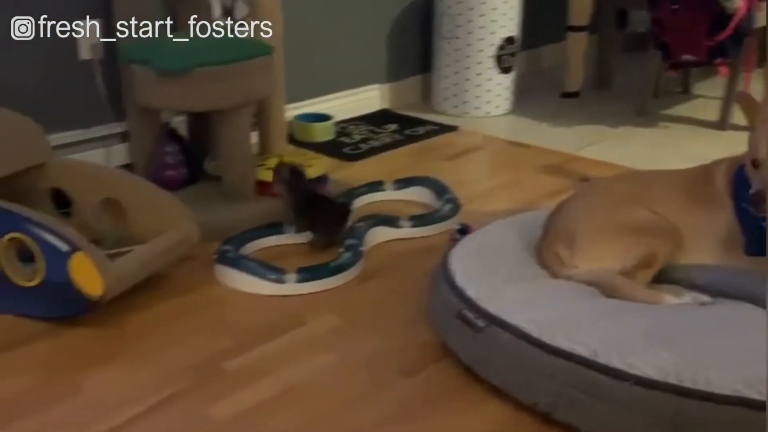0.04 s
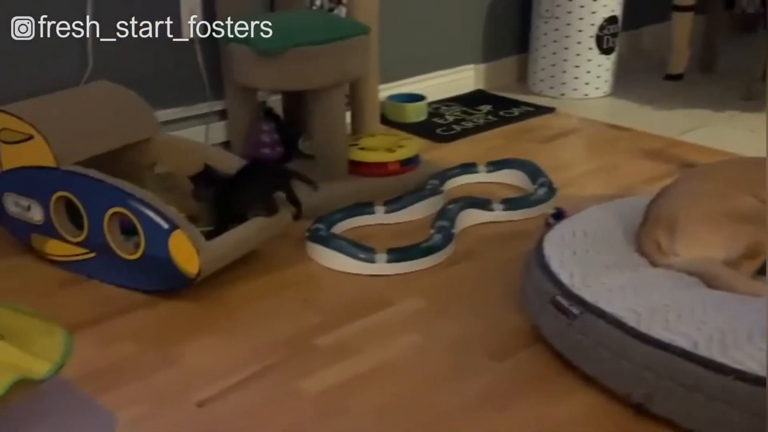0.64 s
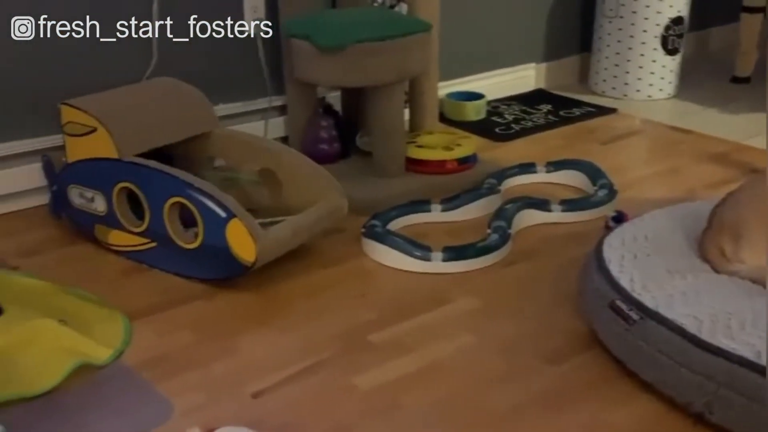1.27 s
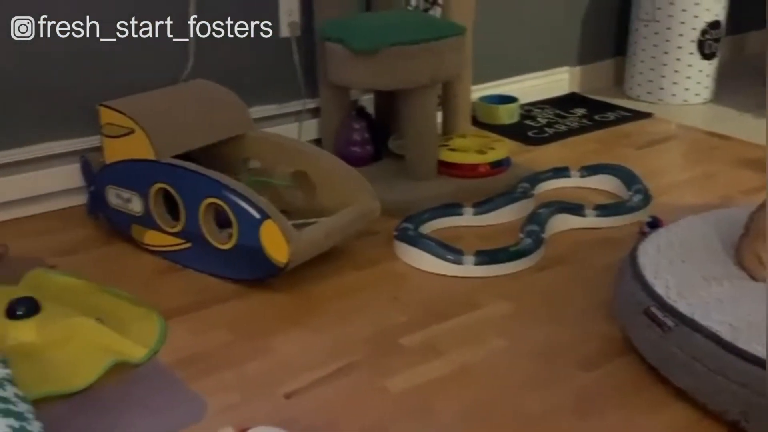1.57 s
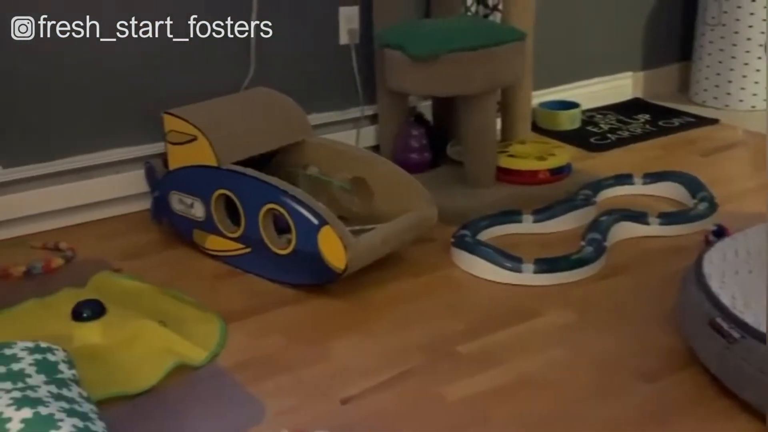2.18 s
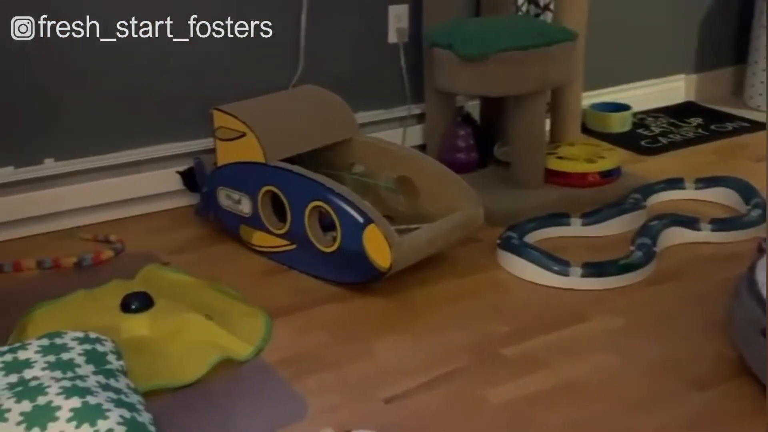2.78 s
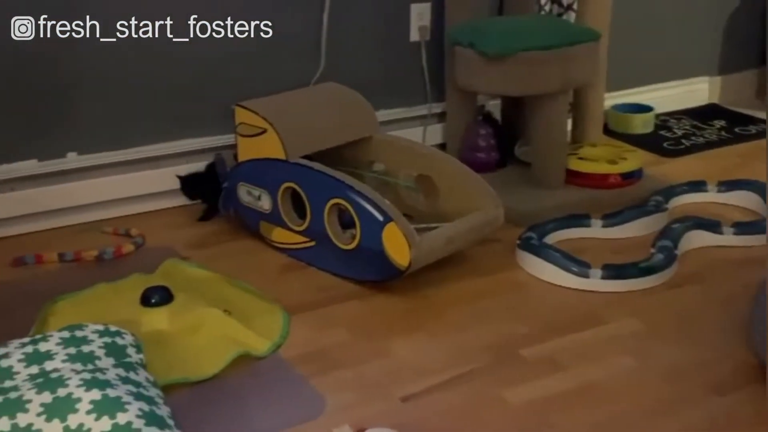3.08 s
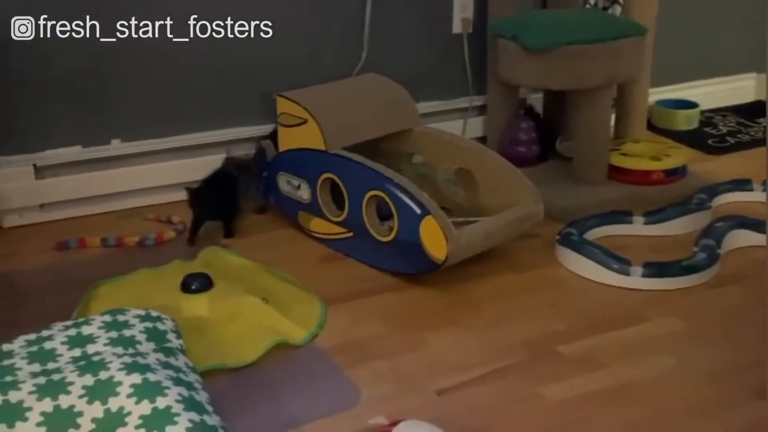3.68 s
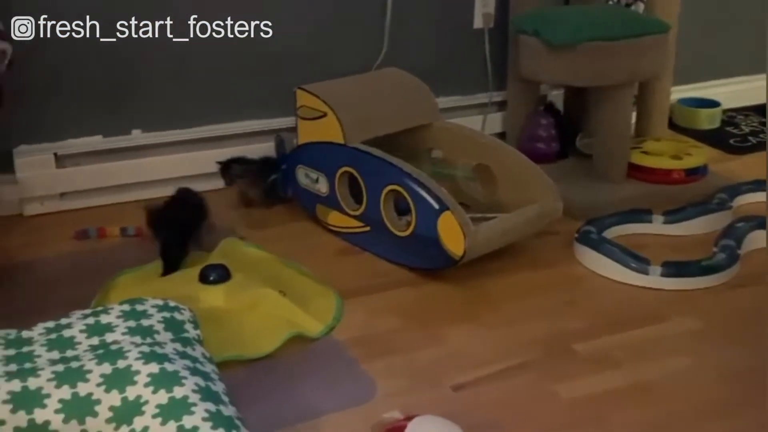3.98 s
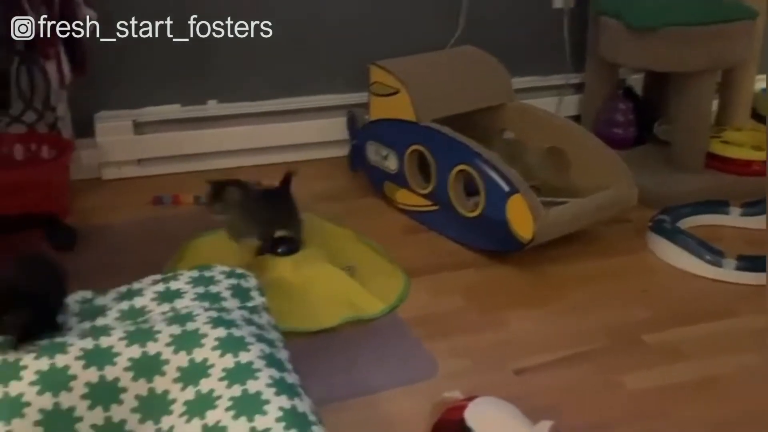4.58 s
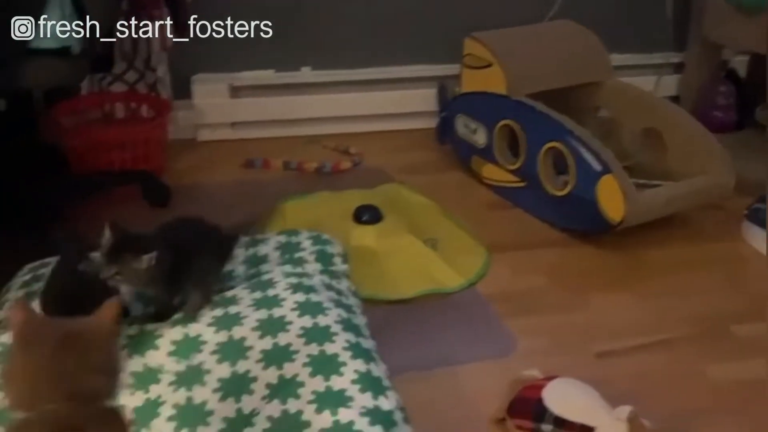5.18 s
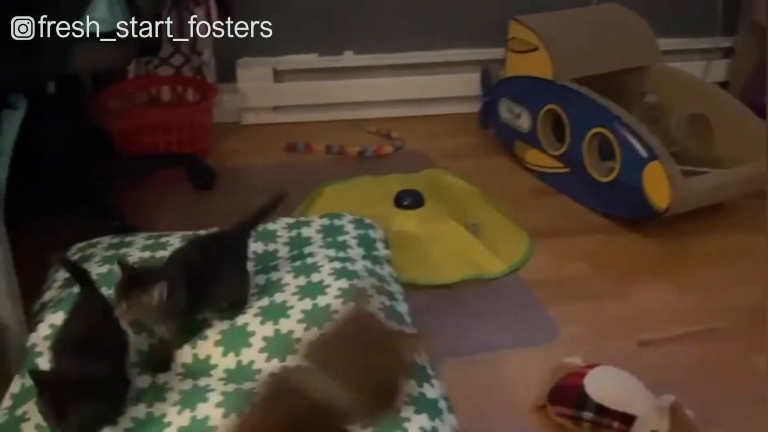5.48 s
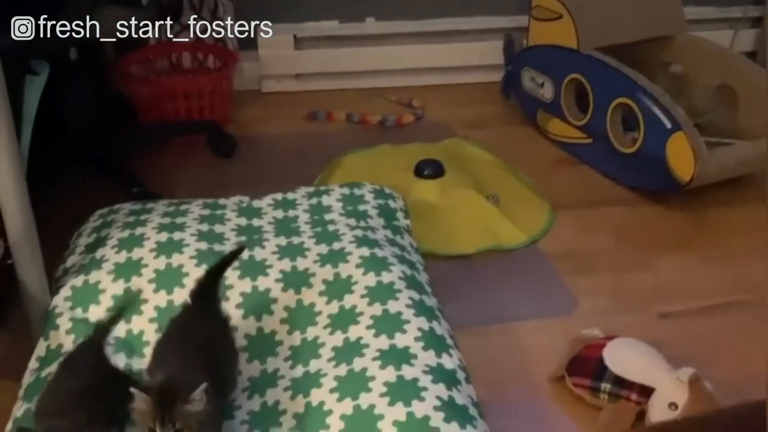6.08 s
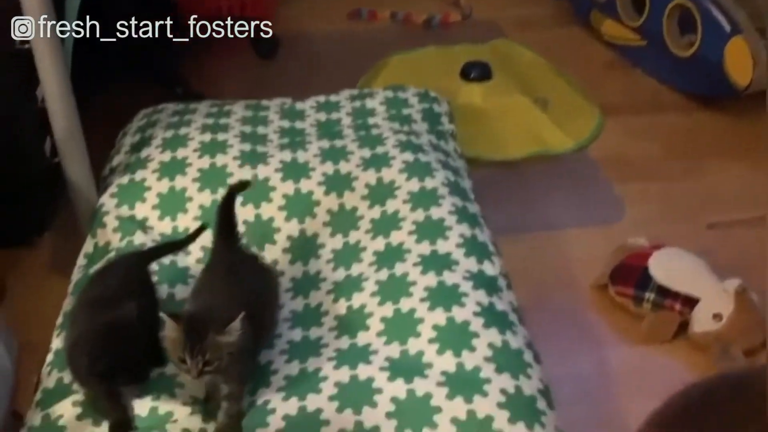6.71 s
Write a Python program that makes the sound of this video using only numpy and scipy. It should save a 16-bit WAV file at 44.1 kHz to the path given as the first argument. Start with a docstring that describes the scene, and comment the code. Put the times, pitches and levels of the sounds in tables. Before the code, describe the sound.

Kittens romp on a wooden floor in a small room with short reflections and a faint, steady appliance hum. At about 0.3 seconds paws thump and shake the boards, and at 0.45 a plastic ball track gives a sharp click, the loudest sound, with a short claw rasp. A heavier cluster of thumps comes from 0.9 to 1.3 seconds, with ticks and cardboard scratching. A tiny bell jingles faintly around 1.2 and 1.5 seconds. A lull follows, holding only soft rustles and an occasional tick. From 3.4 seconds the scampering returns: light paw thuds, claw clicks and scratchy swishes over cloth, busiest between 4.2 and 4.9, with a hollow plastic toy rattling from 4.4 to 4.7. Soft landings and fabric rustles continue until about 5.9 seconds, then fade to a last faint brush near 6.5 and the hum.

```python
"""A small room with a wooden floor, where kittens romp. One clips a plastic ball track and bounds into
a cardboard playhouse, and a toy's tiny bell jingles; then two scamper over a toy's nylon skirt, rattling
its hub, and onto a cushion. Paws thump and shake the boards, claws tick and rasp, fur rustles over
cardboard and cloth. The walls answer every move, over a faint appliance hum."""
import sys
import numpy as np
from scipy import signal
from scipy.fft import rfft, irfft, next_fast_len
from scipy.io import wavfile
from scipy.ndimage import uniform_filter1d, map_coordinates

SR = 44100
rng = np.random.default_rng(int(sys.argv[2]) if len(sys.argv) > 2 else 0)


def inscribe(sig):
    """Save sig as 16-bit PCM at rate SR to the path in sys.argv[1].

    A 1-D sig is mono; a 2-D sig holds one channel per row.
    Samples are clipped to [-1, 1] before scaling.
    """
    pcm = np.round(np.clip(np.atleast_2d(sig).T, -1, 1) * 32767)
    wavfile.write(sys.argv[1], SR, pcm.astype(np.int16))


N = 302069

# Levels in the tables are relative; each layer sets its own trim. decay_s is the time to fall 60 dB.
# Colour of the still air: freq_hz, level_db
AIR_SPECTRUM = [(13, -42.5), (22, 0), (121, -3), (193, -9), (262, 2.5), (345, -15), (407, -6.5), (705, -33),
                (832, -23.5), (2300, -32), (5550, -40.5), (6920, -35.5), (8390, -41), (10700, -40.5),
                (15800, -45)]
# Partials of the appliance hum: pitch_hz, level_db
HUM_PARTIALS = [(59.2, -70), (119, -68.5), (272, -71.5), (414, -83)]
# Fur and claw strokes on cardboard and cloth: start_s, swell_s, hold_s, brush_db, scratch_db, swish_db
RUSTLE_STROKES = [(0.0, 0.002, 0.0093, -52, -75, -84), (0.257, 0.031, 0.1, -57, -51.5, -61.5),
                  (0.431, .008, 0.016, -57, -46.5, -47), (0.51, 0.022, .17, -69, -64.5, -72),
                  (0.69, 0.012, 0.084, -61, -67, -75), (0.856, 0.024, .005, -57.5, -66, -72.5),
                  (0.914, 0.064, .02, -73, -69, -83), (0.991, 0.01, .03, -60, -59, -82),
                  (1.017, 0.07, 0.045, -58, -51.5, -56), (1.195, 0.0064, 0.011, -47.5, -54, -50.5),
                  (1.254, 0.017, 0.011, -58.5, -63.5, -65), (1.37, 0.017, 0.019, -66.5, -80, -87),
                  (1.517, 0.026, 0.063, -70, -77.5, -86), (1.617, 0.074, 1, -78, -81, -87),
                  (2.038, 0.013, 0.056, -70.5, -80, -88), (2.22, 0.057, 0.015, -68, -72.5, -73.5),
                  (2.364, .035, 0.047, -92, -76, -68), (2.429, 0.033, 0.017, -66.5, -76, -83),
                  (2.54, .04, 0.037, -76, -82, -90), (2.603, 0.16, .25, -84.5, -87, -88.5),
                  (2.932, 0.0071, .005, -95, -86, -79), (3.165, 0.056, 0.058, -80, -86, -89),
                  (3.37, 0.037, .04, -70.5, -70, -77), (3.423, 0.072, 0.014, -64, -59, -62.5),
                  (3.526, 0.049, 0.12, -63.5, -58.5, -64.5), (3.719, 0.0078, 0.031, -61.5, -55.5, -57.5),
                  (3.816, 0.022, 0.038, -73, -67, -73), (3.954, .033, 0.021, -69, -52, -54),
                  (4.03, 0.018, .005, -65.5, -60.5, -79), (4.093, 0.07, 0.019, -57, -59, -71.5),
                  (4.242, 0.042, 0.034, -54, -61.5, -67.5), (4.361, .025, 0.016, -56.5, -55, -65.5),
                  (4.443, 0.052, 0.055, -55.5, -65, -89), (4.495, 0.0082, 0.0085, -50.5, -51.5, -62.5),
                  (4.577, 0.016, 0.057, -54, -58.5, -79), (4.814, 0.015, 0.073, -66, -69, -82),
                  (5.07, .01, 0.0054, -66.5, -77.5, -86), (5.151, 0.026, 0.0059, -65, -70, -83),
                  (5.207, .022, .005, -69, -72.5, -81), (5.286, .015, .005, -70, -68, -80),
                  (5.302, 0.0065, 0.018, -60, -67, -76.5), (5.494, 0.026, .02, -62, -72.5, -81),
                  (5.527, .03, .02, -68, -61.5, -73.5), (5.605, 0.049, 0.039, -68.5, -70.5, -79),
                  (5.685, .025, 0.008, -59, -61, -73), (5.823, 0.0045, .008, -69.5, -76, -82),
                  (5.98, 0.056, 0.07, -72.5, -77.5, -87), (6.48, 0.066, 0.08, -82, -89, -95)]
# Colours of the dull brush, the dry scratch and the fine swish: freq_hz, level_db
BRUSH_SPECTRUM = [(200, -31.5), (450, -1), (650, -2), (900, 5), (1200, 0.5), (1700, -8), (2600, -10.5),
                  (5000, -54)]
SCRATCH_SPECTRUM = [(800, -54.5), (1500, -6), (2300, 2.5), (3400, -1.5), (5200, -1), (7300, -1),
                    (8300, -18), (10000, -24.5), (14000, -46.5)]
SWISH_SPECTRUM = [(4000, -45.5), (7000, -1), (8200, 0), (9800, 2), (12000, -0.5), (13500, -8), (15000, 2.5),
                  (16000, -15.5)]
# Low murmur of the floor under light steps: freq_hz, level_db
PATTER_SPECTRUM = [(30, -18), (60, -0.5), (140, 1.5), (195, -9), (260, -2), (400, -2), (520, -14.5),
                   (900, -25.5), (2500, -53.5)]
# Paw landings: start_s, level_db, pitch_hz, decay_s, slap_offset_db
PAW_LANDINGS = [(0.004, -42.5, 97.5, 0.31, -14), (0.264, -39, 137.5, 0.32, -12),
                (0.315, -24.5, 347.6, 0.073, -8), (0.328, -31.5, 150, 0.13, -19),
                (0.340, -25.5, 107, 0.15, -10), (0.356, -24.5, 256.5, 0.13, -5),
                (0.371, -26.5, 313, 0.048, -9), (0.421, -36, 91.5, 0.21, -19), (0.604, -51.5, 240, 0.1, 8),
                (0.71, -42, 140.5, 0.21, 5.5), (0.752, -54, 135, .06, 3), (0.897, -23, 130.6, .11, -27),
                (0.932, -23, 289, 0.065, -27), (0.941, -20.5, 150, .17, -35),
                (0.956, -21.5, 94.4, 0.17, -30), (0.977, -23, 87.5, 0.076, -24),
                (1.009, -30.5, 80, .05, -11), (1.09, -39.5, 150, 0.18, 2.5), (1.205, -29, 314.3, .14, -0.5),
                (1.234, -30, 139, 0.16, -19), (1.257, -36.5, 89, 0.22, -8), (2.189, -54, 134, .15, -9),
                (3.48, -58, 160, .1, -6), (3.672, -42, 162, .073, 0.5), (3.743, -42, 315, 0.1, 1.5),
                (3.985, -52, 167, .054, 0), (4.047, -47, 340, 0.071, -6), (4.165, -40, 270, 0.12, -3.5),
                (4.231, -42, 127, 0.29, -11), (4.285, -31, 112, 0.13, -8), (4.304, -40, 191, 0.1, 0),
                (4.355, -33.5, 319, 0.049, -4), (4.368, -29, 132, 0.071, -31),
                (4.419, -45.5, 102.6, 0.34, -19), (4.554, -34, 123, 0.066, -11),
                (4.578, -34.5, 148, 0.047, -8), (4.622, -40, 84, .13, -9), (4.690, -48, 332, 0.12, -19),
                (4.733, -41, 273, 0.049, 0.5), (4.847, -26.5, 138, 0.063, -24),
                (4.897, -40, 212, 0.098, -18), (5.090, -32, 385, 0.039, -11.5),
                (5.185, -28.5, 129, 0.065, -12), (5.353, -42, 325, 0.051, -2.5),
                (5.514, -42.5, 323, 0.029, -1), (5.664, -42, 150, 0.053, -13), (5.713, -31, 108, 0.09, -16),
                (5.835, -46, 372, 0.12, -11)]
# Floorboard resonances: pitch_hz, level_db, decay_s
BOARD_MODES = [(87, 2, .16), (150, 5, .12), (250.7, 1, 0.14), (303, -2.5, 0.075), (385, -12, .10)]
# Dull slap of a paw pad: freq_hz, level_db
PAD_SPECTRUM = [(80, -16), (200, 4), (420, 1), (600, -6.5), (1100, -14.5), (2500, -34.5), (6000, -59)]
# Claws and toys ticking on hard things: start_s, level_db, tilt_db_per_octave
HARD_CONTACTS = [(0.255, -48, 8), (0.267, -31, 1.5), (0.285, -22.5, 2.5), (0.432, -28, -2),
                 (0.4426, -12.5, 4), (0.452, -29, -3), (0.702, -52, 10), (0.762, -52, -2),
                 (0.880, -37.5, -19), (1.006, -34.5, -8.5), (1.167, -42, -6), (1.205, -27.5, 9.5),
                 (1.212, -42.5, 9), (2.054, -49.5, -18), (3.116, -49, -8.5), (3.402, -53.5, -9),
                 (3.491, -40, 8), (3.585, -48, -5), (3.70, -39.5, -9), (3.73, -31, 11), (3.780, -36.5, -3),
                 (3.965, -44, 8), (4.277, -41, 4), (4.296, -32, -10.5), (4.326, -37, -12), (4.389, -41, 0),
                 (4.499, -32.5, 4.5), (4.514, -47, -9), (4.621, -42, -6), (4.670, -37.5, -13),
                 (4.836, -49, 7), (5.181, -52.5, -3), (5.235, -48, -10), (5.310, -49.5, -13),
                 (5.354, -47, -13), (5.512, -45.5, -15.5), (5.711, -45, -14), (5.831, -54, -10)]
# Bright crack of a hard contact: freq_hz, level_db
CRACK_SPECTRUM = [(300, -19), (1200, -5.5), (1650, -3), (2000, 5), (2700, 3.5), (4300, 4.5), (5900, 5),
                  (7500, 5.5), (9500, -13.5), (12000, -9.5), (15800, -22)]
# Resonances of the ball track and toys: pitch_hz, level_db, decay_s
PLASTIC_MODES = [(1965, -9.5, .04), (3064, -0.5, .10), (3520, 6, 0.07), (3790, -5.5, 0.041),
                 (3973, -5.5, .10), (4130, -2.5, .10), (4564, -2.5, .11), (4676, -1.5, 0.13),
                 (4900, -3, .10), (5690, -4.5, .12), (6660, -3, 0.074), (7415, -2, 0.076), (7330, -7, .09)]
# Claws dragged over plastic, cardboard and weave: start_s, end_s, level_db, first_hz, last_hz
CLAW_DRAGS = [(0.434, 0.528, -47.5, 4415, 3800), (0.682, 0.8, -62.5, 2686, 2860),
              (1.551, 1.67, -76, 2980, 3170), (1.919, 2.292, -82.5, 3170, 3010),
              (2.38, 2.443, -72.5, 4900, 5030), (4.264, 4.348, -58.5, 2897, 3077),
              (4.375, 4.417, -53, 2900, 3080), (4.494, 4.531, -48, 3100, 3266),
              (5.296, 5.338, -65, 1103, 3300), (5.522, 5.610, -59, 1388, 2633),
              (6.528, 6.66, -84.5, 3050, 3160)]
# Nudges to a toy's tiny bell: start_s, level_db
BELL_NUDGES = [(1.17, -58), (1.235, -52), (1.482, -59.5), (1.517, -68)]
# Resonances of the bell: pitch_hz, level_db, decay_s
BELL_MODES = [(8240, 1, 0.079), (8140, 2.5, 0.21), (9530, -3.5, 0.2), (9960, -12, 0.13), (10300, -13, 0.16)]
# Knocks on the toy's hollow plastic hub: start_s, level_db
HUB_KNOCKS = [(4.418, -46.5), (4.461, -48), (4.497, -42), (4.596, -36.5), (4.611, -42), (4.632, -43),
              (4.652, -45), (4.696, -51.5)]
# Resonances of the hub: pitch_hz, level_db, decay_s
HUB_MODES = [(985, -33, 0.11), (1120, 2.5, 0.12), (1220, 4.5, 0.043), (1456, -4, 0.052), (1830, -14, 0.061)]
# How alike left and right are in diffuse sound: freq_hz, correlation
STEREO_LIKENESS = [(60, 0.82), (200, 0.83), (400, .75), (650, .15), (1000, .05), (2400, 0.11), (6000, 0.55),
                   (9000, 1), (15000, 0.58)]
# Reverb time of the room: freq_hz, decay_s
WALL_DECAY = [(80, 0.31), (300, 0.25), (1000, 0.28), (4000, 0.33), (8000, 0.25), (15000, 0.25)]
# Treble response of the microphone: freq_hz, gain_db
MIC_RESPONSE = [(7900, 0), (8250, -4.5), (8600, -14.5), (9200, 3), (12500, 3.5), (13400, -7), (14500, 0.5)]


def amp(db):
    """Decibels to gain."""
    return 10 ** (np.asarray(db) / 20)


def unit_rms(x):
    """Scale to an rms of 1."""
    return x / np.sqrt(np.mean(x ** 2) + 1e-20)


def curve_at(points, hz):
    """Read (freq_hz, value) points along a log frequency axis."""
    freqs, values = np.transpose(points)
    return np.interp(np.log(hz + 1), np.log(freqs + 1), values)


def wobble(rate_hz):
    """A smooth random curve with rate_hz knots a second."""
    knots = rng.standard_normal(int(N * rate_hz / SR) + 4)
    return map_coordinates(knots, [np.arange(N) * rate_hz / SR])


def filtered(x, response):
    """Zero-phase filter; response gives the gain at each frequency."""
    n = x.shape[-1]
    size = next_fast_len(n + SR // 10)
    return irfft(rfft(x, size) * response(np.fft.rfftfreq(size, 1 / SR)), size)[..., :n]


def eq(x, spectrum):
    """Colour a sound with a (freq_hz, level_db) curve."""
    return filtered(x, lambda hz: amp(curve_at(spectrum, hz)))


def add(track, start_s, sound):
    """Mix a sound into the track at start_s."""
    part = track[..., max(0, round(start_s * SR)):][..., :sound.shape[-1]]
    part += sound[..., :part.shape[-1]]


def diffuse(pair):
    """Two unrelated signals become left and right of a sound that arrives from all sides."""
    width = lambda hz: np.arccos(np.clip(curve_at(STEREO_LIKENESS, hz), -1, 1)) / 2
    mid, side = filtered(pair, lambda hz: np.array([np.cos(width(hz)), np.sin(width(hz))]))
    return np.array([mid + side, mid - side])


def in_room(x, wet_db):
    """The direct sound plus a fresh tail from the walls; each frequency dies at its own speed."""
    hz, t, bands = signal.stft(rng.standard_normal((2, SR // 3)), SR, nperseg=256)
    decay = amp(-60 * t / curve_at(WALL_DECAY, hz)[:, None])
    tail = diffuse(signal.istft(bands * decay, SR, nperseg=256)[1])
    tail *= 1 - np.exp(-np.arange(tail.shape[1]) / SR / 0.0061)  # reflections build up
    reverb = signal.fftconvolve(np.atleast_2d(x), tail / np.linalg.norm(tail[0]), axes=1)
    return x + amp(wet_db) * reverb[:, :x.shape[-1]]


def ring(modes, t, spread):
    """Damped modes, with new strengths and slightly new pitches for each place struck."""
    hz, db, decay_s = np.transpose(modes)[:, :, None]
    strength, detune = rng.standard_normal((2, len(modes), 1))
    envelopes = amp(db + 2 * strength - 60 * t / decay_s)
    return np.sum(envelopes * np.sin(2 * np.pi * hz * (1 + spread * detune) * t), axis=0)


def room_tone():
    """The bed: still air and an appliance's slightly unsteady hum."""
    air = unit_rms(eq(diffuse(rng.standard_normal((2, N))), AIR_SPECTRUM))
    hum, t = np.zeros(N), np.arange(N) / SR
    for hz, db in HUM_PARTIALS:
        gain = np.sqrt(2) * amp(db + 1.5 * wobble(4.2))
        hum += gain * np.sin(2 * np.pi * hz * t + 0.53 * wobble(8.3))
    return (amp(-66 + 1.1 * wobble(6)) * air + hum) * amp([[-0.6], [0.6]])  # leans right


def stroke_gains():
    """Brush, scratch and swish envelopes: each stroke swells, sags while held, then dies away."""
    sag_db_per_s, release_db_per_s = 3.5, 231.5
    t, power = np.arange(N) / SR, np.zeros((3, N))
    for start_s, swell_s, hold_s, *levels_db in RUSTLE_STROKES:
        held_s = np.maximum(t - start_s - swell_s, 0)
        fade_db = sag_db_per_s * held_s + release_db_per_s * np.maximum(held_s - hold_s, 0)
        envelope = np.clip((t - start_s) / swell_s, 0, 1) * amp(-np.minimum(fade_db, 200))
        power += np.outer(amp(levels_db) ** 2, envelope ** 2)
    return np.sqrt(power)


def patchy(pair, depth_db):
    """Each contact favours its own frequencies for a few hundredths of a second."""
    bands = signal.stft(pair, nperseg=1024)[2]
    patches = uniform_filter1d(rng.standard_normal(bands.shape[1:]), size=6, axis=0)  # across pitch
    patches = uniform_filter1d(patches, size=4, axis=1)  # across time
    return signal.istft(bands * amp(depth_db * unit_rms(patches)), nperseg=1024)[1][:, :N]


def rub(gain, spectrum, snaps_per_s, grain_db, flutter_db, wet_db):
    """Fibres catch and slip: tiny snaps on a fluttering hiss, scattered by nearby surfaces."""
    snaps = unit_rms(rng.standard_normal(N) * (rng.random(N) < snaps_per_s / SR))
    hiss = diffuse(rng.standard_normal((2, N)))
    slips = eq(patchy(hiss + amp(grain_db) * snaps, depth_db=2.6), spectrum)
    stroke = gain * unit_rms(slips * amp(flutter_db * wobble(55)))
    return in_room(stroke, wet_db) / np.hypot(1, amp(wet_db))


def rustle(gains):
    """Fur and claws drag over cardboard and cloth: dull brush, dry scratch and a fine swish on top."""
    brush, scratch, swish = gains * amp([[-0.62], [-2.5], [-1.5]])
    return (rub(brush, BRUSH_SPECTRUM, snaps_per_s=160, grain_db=-6, flutter_db=1, wet_db=-7.5)
            + rub(scratch, SCRATCH_SPECTRUM, snaps_per_s=140, grain_db=-9.5, flutter_db=2.5, wet_db=-7.5)
            + rub(swish, SWISH_SPECTRUM, snaps_per_s=450, grain_db=-6, flutter_db=2, wet_db=-8))


def patter(gains):
    """Many light steps keep the floor murmuring: the harder the kittens scuffle, the louder."""
    smear_s, medium_stroke_db = 0.088, -60
    rubbing_power = np.abs(uniform_filter1d(np.sum(gains ** 2, axis=0), size=round(smear_s * SR)))
    effort = np.sqrt(rubbing_power) / amp(medium_stroke_db)
    gain = amp(-58) * effort ** 0.58
    return rub(gain, PATTER_SPECTRUM, snaps_per_s=80, grain_db=-9, flutter_db=2.5, wet_db=-5)


def paw_thumps():
    """A soft landing booms in what it hits and shakes the floorboards; the pad's slap fills the room."""
    medium_landing_db, boards_db_per_db = -36, 0.6
    thumps, slaps, t = np.zeros(N), np.zeros(N), np.arange(SR // 3) / SR
    for start_s, db, hz, decay_s, slap_offset_db in PAW_LANDINGS:
        boom = np.sin(2 * np.pi * hz * t) * amp(-60 * t / decay_s) * (1 - np.exp(-t * hz / 0.87))
        boards = ring(BOARD_MODES, t, spread=0.095) * (1 - np.exp(-t / 0.0037))
        boards_db = medium_landing_db - 12.5 + boards_db_per_db * (db - medium_landing_db)
        pad_noise = unit_rms(eq(rng.standard_normal(len(t)), PAD_SPECTRUM))
        slap = pad_noise * amp(-60 * t / 0.06) * (1 - np.exp(-t / 0.0018))
        add(thumps, start_s, amp(db) * boom + amp(boards_db) * boards)
        add(slaps, start_s, amp(db + slap_offset_db - 6) * slap)
    return (in_room(thumps, wet_db=-7) + in_room(slaps, wet_db=-1)) * amp([[-0.3], [0.3]])


def hard_ticks():
    """A hard contact is a sharp snap, brief chatter and a short plastic ring, mostly off the walls."""
    out, t = np.zeros((2, N)), np.arange(SR // 3) / SR
    lead = SR // 1000  # pre-roll keeps the filtered attack whole
    for start_s, db, tilt_db_per_octave in HARD_CONTACTS:
        chatter = amp(-16.5) * rng.standard_normal(len(t)) * amp(-60 * t / 0.0095)
        snap = np.pad((t == 0) + chatter, (lead, 0))
        plastic = np.pad(ring(PLASTIC_MODES, t, spread=0.004), (lead, 0))
        tilt = lambda hz: amp(tilt_db_per_octave * np.log2(np.clip(hz, 700, 12000) / 4000))
        contact = filtered(eq(snap, CRACK_SPECTRUM) + amp(-41.5) * plastic, tilt)
        contact /= np.max(np.abs(contact))
        add(out, start_s - lead / SR, amp(db - 2.5) * in_room(contact, wet_db=1.8))
    return out


def claw_swipes():
    """Threads pass under a dragged claw: its rasp glides in pitch as its speed changes."""
    roughness_hz = 560
    out = np.zeros((2, N))
    for start_s, end_s, db, first_hz, last_hz in CLAW_DRAGS:
        progress = np.linspace(0, 1, round((end_s - start_s) * SR))
        phase = 2 * np.pi * np.cumsum(first_hz + (last_hz - first_hz) * progress) / SR
        grit = unit_rms(filtered(rng.standard_normal(SR), lambda hz: 1 / (1 + (hz / roughness_hz) ** 2)))
        rasp = amp(db) * np.sin(np.pi * progress) * grit[:len(progress)] * np.sin(phase)
        add(out, start_s, in_room(np.pad(rasp, (0, SR // 3)), wet_db=-3))
    return out


def bell_jingles():
    """A pellet skitters inside the little bell and strikes it many times: a rough shimmer."""
    out, t = np.zeros(N), np.arange(SR // 4) / SR
    for start_s, db in BELL_NUDGES:
        for delay_s in rng.gamma(2, 0.012, size=12):
            add(out, start_s + delay_s, amp(db - 14.5) * ring(BELL_MODES, t, spread=0.018))
    return in_room(out, wet_db=-7.5)


def hub_rattle():
    """The toy's hollow hub knocks and rings as a kitten treads on its skirt."""
    out, t = np.zeros((2, N)), np.arange(SR // 2) / SR
    for start_s, db in HUB_KNOCKS:
        add(out, start_s, amp(db - 11) * in_room(ring(HUB_MODES, t, spread=0.015), wet_db=4))
    return out


def scene():
    """The mix: footfalls for weight, ticks and toys for sparkle, friction for texture, over the bed."""
    gains = stroke_gains()
    footfalls = paw_thumps() + patter(gains)
    toys = hard_ticks() + hub_rattle() + bell_jingles()
    friction = rustle(gains) + claw_swipes()
    return footfalls + toys + friction + room_tone()


def record(dry):
    """The microphone has two narrow dips in the treble and keeps nothing above its band limit."""
    band_limit_hz = 15850
    return filtered(dry, lambda hz: amp(curve_at(MIC_RESPONSE, hz)) * (hz < band_limit_hz))


dry = scene()
out = record(dry)
inscribe(out)
```